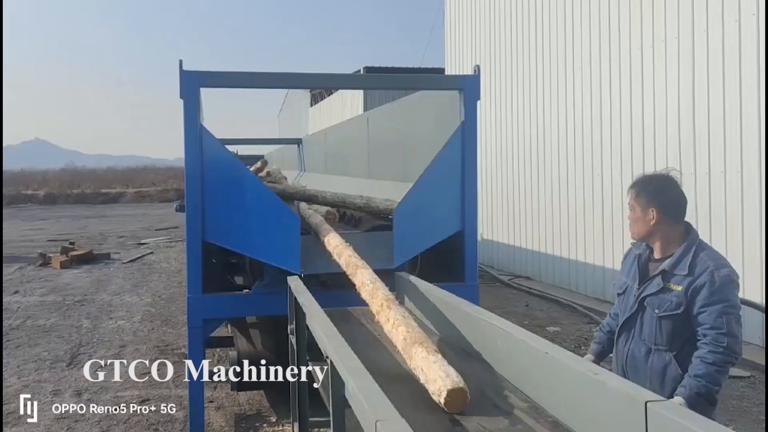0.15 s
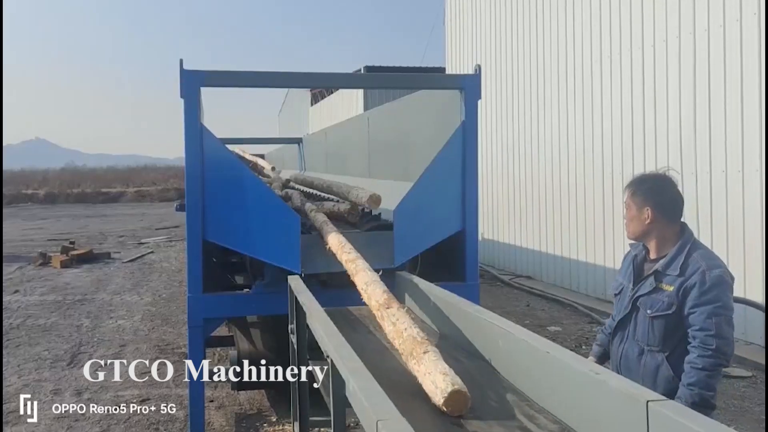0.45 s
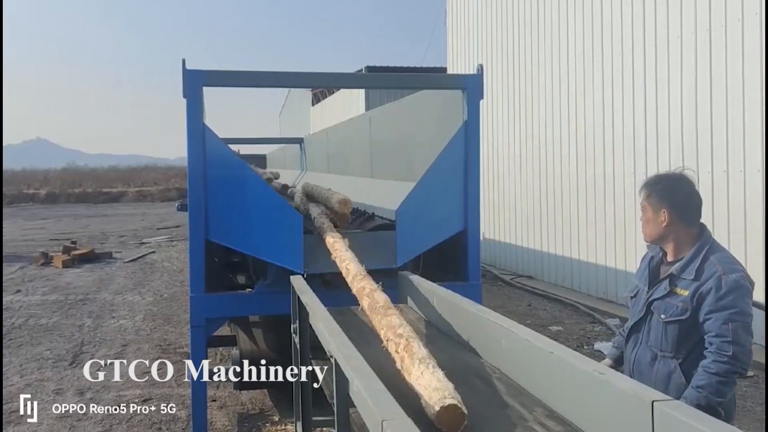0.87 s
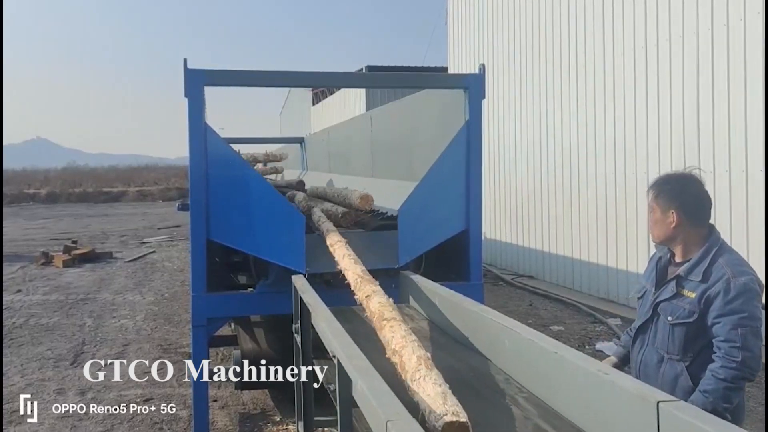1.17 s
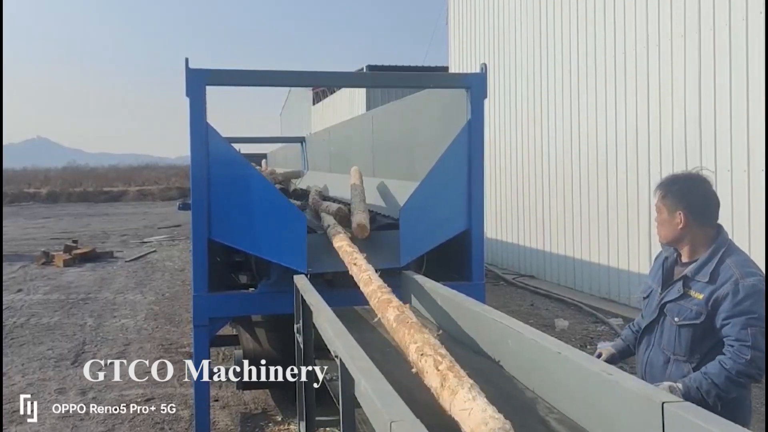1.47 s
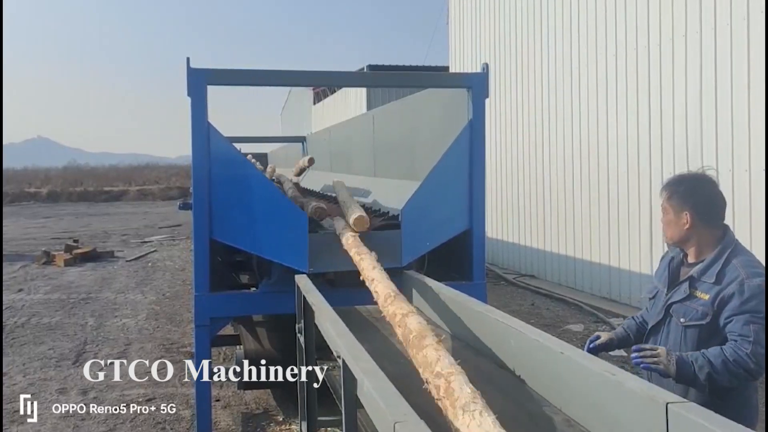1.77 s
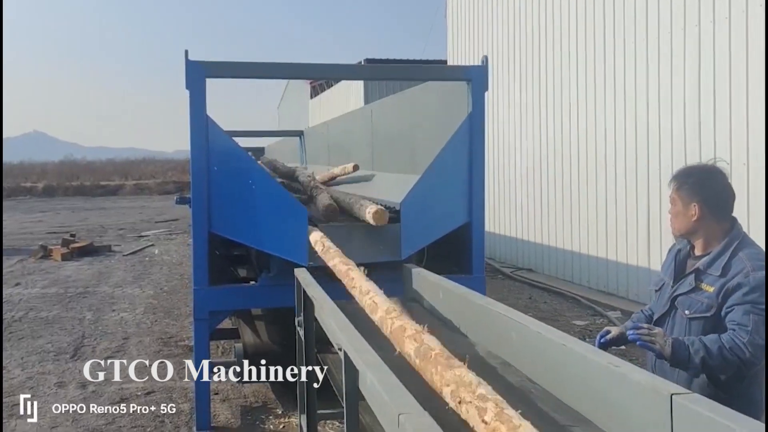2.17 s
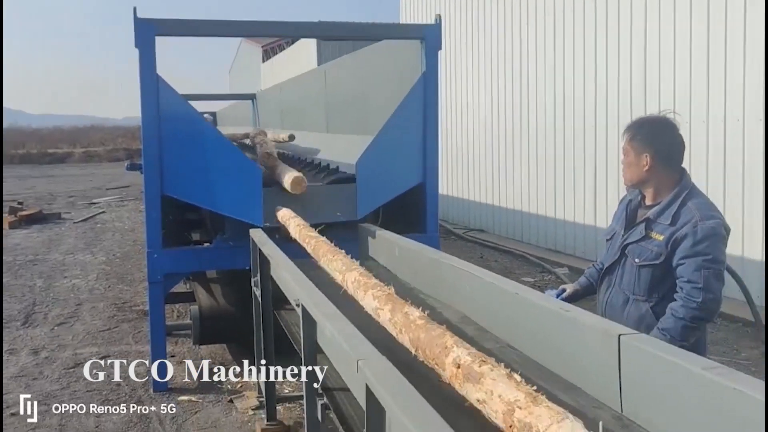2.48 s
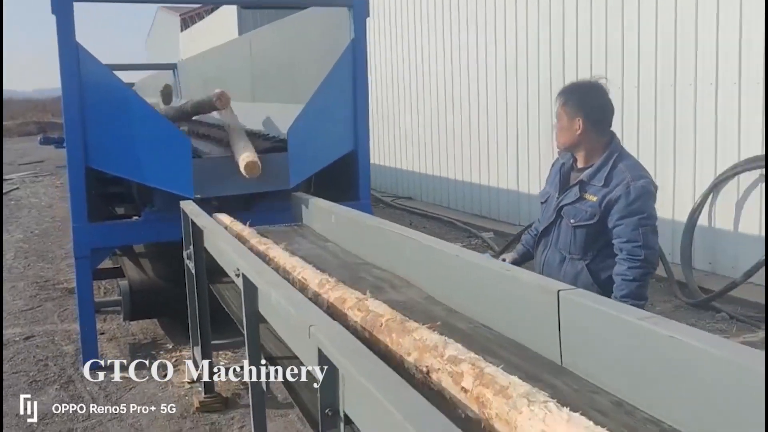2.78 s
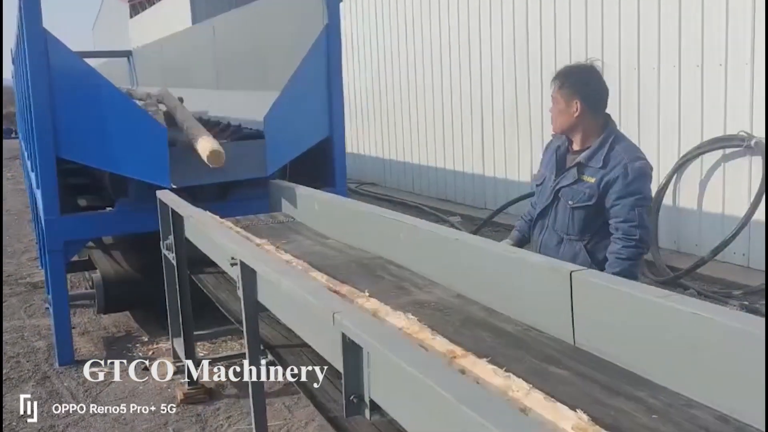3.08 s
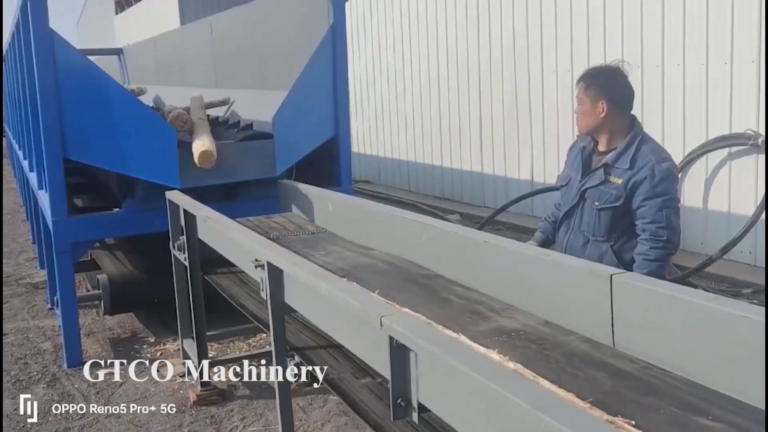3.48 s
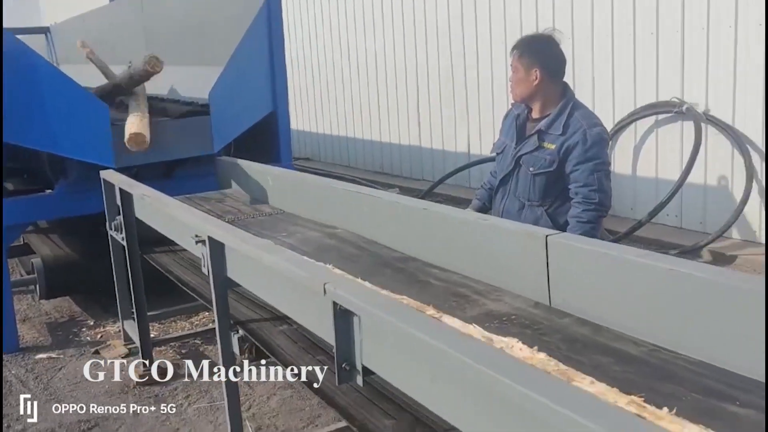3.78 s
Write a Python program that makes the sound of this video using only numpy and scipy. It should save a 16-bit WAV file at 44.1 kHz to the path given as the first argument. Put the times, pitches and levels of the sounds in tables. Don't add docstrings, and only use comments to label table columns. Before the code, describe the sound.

After a brief silence, a loud debarking machine cuts in and runs to the end, its low boom covered by rasping bark, skidding logs and irregular wooden thuds, heard outdoors on a slowly turning phone.

```python
import sys
import numpy as np
from scipy import signal
from scipy.fft import rfft, irfft, next_fast_len
from scipy.io import wavfile
from scipy.ndimage import uniform_filter1d, minimum_filter1d

SR = 44100
rng = np.random.default_rng(int(sys.argv[2]) if len(sys.argv) > 2 else 0)


def field_ratio(decibels):
    return 10 ** (np.asarray(decibels, dtype=float) / 20)


def to_wav(s):
    ch = np.atleast_2d(s).T
    pcm = np.round(np.clip(ch, -1, 1) * 32767)
    wavfile.write(sys.argv[1], SR, pcm.astype(np.int16))


N = 173754


def rms_one(x):
    return x / np.sqrt(np.mean(x ** 2) + 1e-20)


def seconds():
    return np.arange(N) / SR


def drift(rate_hz):
    r = np.exp(-2 * np.pi * rate_hz * 40 / SR)
    noise = rng.standard_normal(N // 40 + 2002)
    slow = signal.lfilter([1], [1, -2 * r, r * r], noise)[2000:]
    return np.interp(np.arange(N) / 40, np.arange(len(slow)), rms_one(slow))


def hail(per_s, spread_db):
    size = field_ratio(spread_db * np.minimum(rng.exponential(1, N), 4)) * rng.standard_normal(N)
    struck = rng.random(N) < per_s / SR
    return rms_one(size * struck)


def coloured(x, points, patchy_db):
    hz, db = np.transpose(points)
    size = next_fast_len(N)
    f = np.arange(size // 2 + 1) * SR / size + 1e-3
    colour_db = np.interp(np.log(f), np.log(hz), db, left=-120, right=-120)
    spec = rfft(x, size) * field_ratio(colour_db)
    out = 0
    for centre in np.arange(np.log2(hz[0]), np.log2(hz[-1]) + 1 / 3, 1 / 3):
        share = np.clip(1 - 3 * np.abs(np.log2(f) - centre), 0, 1)
        out = out + irfft(spec * share, size)[:N] * field_ratio(patchy_db * drift(7.7))
    return rms_one(out)


def resonate(x, hz, width_hz):
    r = np.exp(-np.pi * width_hz / SR)
    dull = signal.sosfilt(signal.butter(2, 2 * hz, fs=SR, output="sos"), x)
    return rms_one(signal.lfilter([1, 0, -1], [1, -2 * r * np.cos(2 * np.pi * hz / SR), r * r], dull))


def steep_cut(x, hz):
    return signal.sosfilt(signal.cheby2(14, 75, hz, fs=SR, output="sos"), x)


def turned():
    middle_s, pace_s = 2.92, 0.53
    return 1 / (1 + np.exp(-(seconds() - middle_s) / pace_s))


def trough():
    # frequency in Hz, level in dB per Hz
    boom_colour = [(53, -32), (90, -8.5), (166, -0.5), (217, -3), (444, -9.5), (634, -10.5), (979, -20.5),
                   (1130, -21), (1900, -37), (2470, -68), (4180, -120)]
    # pitch in Hz, width in Hz, level in dB, change once turned aside in dB
    steel_panels = [(153, 27, -35, 0), (183, 14, -30, 1), (208.6, 11.3, -31, 0), (227.2, 11.6, -29.5, -0.3),
                    (406, 34, -42.5, 2), (516.4, 37, -37.5, 0.5), (646, 25, -36, -0.5),
                    (1143, 22, -44.5, -14), (1690, 17, -53, -3), (3330, 300, -53.5, -6),
                    (2380, 300, -57, 4)]
    # time in seconds, level in dB
    wood_load = [(.3, -1.1), (.5, -1.2), (.7, -.3), (.95, 0), (1.2, 0.3), (1.5, -1.3), (1.78, .3),
                 (1.81, -0.5), (1.87, -1.5), (2.1, 0.4), (2.4, 0.5), (2.7, -.3), (2.95, -0.6), (3.2, 0.5),
                 (3.45, 0.8), (3.63, 0.5), (3.8, -1.2), (3.94, 0.1)]
    blows_per_s, spread_db = 5000, 1
    far_blows = hail(blows_per_s, spread_db)
    near_blows = hail(blows_per_s, spread_db)
    boom = field_ratio(-21) * coloured(far_blows, boom_colour, patchy_db=0.63)
    aside = turned()
    ringing = 0
    for k, (hz, width_hz, db, turn_db) in enumerate(steel_panels):
        sign = (-1) ** k
        ringing = ringing + sign * field_ratio(db + turn_db * aside) * resonate(near_blows, hz, width_hz)
    load_db = np.interp(seconds(), *np.transpose(wood_load))
    return field_ratio(load_db) * (boom + ringing)


def rasp():
    # frequency in Hz, level in dB per Hz
    front_colour = [(900, -36), (1490, -2), (1950, -5), (2610, -5.5), (3350, -2), (4250, -8.5), (5730, -9),
                    (6510, -17), (8050, -14.5), (9010, -36)]
    # frequency in Hz, level in dB per Hz
    aside_colour = [(900, -39), (1490, -0.5), (1910, -4), (2410, 0.5), (3310, -6), (4250, -7),
                    (5730, -11.5), (6510, -15), (8050, -18), (9010, -32)]
    chips_per_s = 24000
    aside = turned()
    front = field_ratio(-39) * coloured(hail(chips_per_s, 0.43), front_colour, patchy_db=1.16)
    side = field_ratio(-37.5) * coloured(hail(chips_per_s, 0.99), aside_colour, patchy_db=1.0)
    sway = field_ratio(0.5 * drift(22.0))
    return sway * (np.sqrt(1 - aside) * front + np.sqrt(aside) * side)


def sheen():
    # frequency in Hz, level in dB per Hz
    sheen_colour = [(8000, -2), (8700, -6.5), (9600, -10.5), (11200, -8.5), (12000, -17), (12400, -48)]
    return field_ratio(-62.5 + 0.89 * drift(3.7)) * coloured(rng.standard_normal(N), sheen_colour, patchy_db=3.0)


def wind():
    # time in seconds, level in dB
    gusts = [(0.2, -35), (0.32, -30.5), (.55, -36), (0.87, -26.5), (1.1, -35.5), (1.32, -26.5), (1.53, -25),
             (1.6, -34), (1.7, -27), (1.88, -36), (2.0, -24.5), (2.22, -35), (2.5, -27), (2.72, -32),
             (2.95, -28.5), (3.4, -31), (3.94, -27.5)]
    # frequency in Hz, level in dB per Hz
    wind_colour = [(10, -34), (25, -2.5), (40, -2.5), (64, 7.5), (100, -2.5), (130, -6), (200, -36)]
    gust_db = np.interp(seconds(), *np.transpose(gusts)) - 1.5
    return field_ratio(gust_db) * coloured(rng.standard_normal(N), wind_colour, patchy_db=2.5)


def skids():
    # peak in seconds, level in dB, rise in seconds, fall in seconds, tooth ring in Hz
    skid_events = [(.21, -38, .04, 0.034, 3200), (0.25, -43, .001, 0.0033, 3300),
                   (.531, -32.5, 0.038, 0.026, 3070), (.575, -34, 0.018, .02, 3620),
                   (.626, -38, 0.024, 0.026, 3200), (.96, -43, 0.028, .02, 3200),
                   (.991, -36, 0.037, 0.06, 3730), (1.075, -45, .02, .015, 3600),
                   (1.101, -40.5, 0.018, 0.03, 3000), (1.531, -39.5, 0.022, 0.11, 3300),
                   (1.971, -44, .035, 0.032, 3300), (3.5, -42, 0.049, 0.035, 3240)]
    # frequency in Hz, level in dB per Hz
    skid_colour = [(1060, -42), (1800, -6), (2650, -10), (3300, -2.5), (4200, -7.5), (5470, -8),
                   (8070, -19), (8600, -22), (11000, -26.5), (12100, -46)]
    t = seconds()
    grit = hail(9000, 1.7)
    broad = coloured(grit, skid_colour, patchy_db=0.4)
    out = 0
    for s, db, rise_s, fall_s, hz in skid_events:
        slope_s = np.where(t < s, rise_s, fall_s)
        swell = field_ratio(db) * np.exp(-((t - s) / slope_s) ** 2)
        out = out + swell * (broad + field_ratio(-9.5) * resonate(grit, hz, width_hz=170))
    return out


def ticks():
    # start in seconds, level in dB
    snaps = [
        (0.22, -25.5),
        (2.637, -24.5),
        (1.803, -29),
    ]
    t, fall_s = seconds(), 0.0013
    crack = signal.lfilter([1], [1, -0.7], rng.standard_normal(N))
    shape = 0
    for s, db in snaps:
        shape = shape + field_ratio(db) * (t >= s) * np.exp(-np.maximum(t - s, 0) / fall_s)
    return crack * shape


def wooden_blows(rows, t60_s, gain_db, swell_s):
    out, t = np.zeros(N + SR), np.arange(SR // 4) / SR
    for s, db, hz in rows:
        tone = np.sin(2 * np.pi * hz * t) + field_ratio(-8.5) * np.sin(2 * np.pi * 1.37 * hz * t)
        decay = field_ratio(db + gain_db - 60 * t / t60_s)
        start = int(s * SR)
        out[start:start + len(t)] += decay * (1 - np.exp(-t / swell_s)) * tone
    return out[:N]


def knocks():
    # start in seconds, level in dB, pitch in Hz
    knock_events = [(.34, -1, 187), (.368, -9, 506), (.469, -5, 343), (.625, -14, 782), (0.653, -6, 209),
                    (1.265, -2, 188), (1.764, -4, 168), (1.784, -2.5, 175), (1.803, -5.5, 564),
                    (1.825, -3.5, 554), (1.988, -10.5, 230), (2.457, -7.5, 398), (2.636, -8, 576),
                    (.43, -10, 527), (.607, -11.5, 347), (1.163, -10.5, 507), (1.698, -17, 483),
                    (2.235, -14.5, 331), (2.278, -20, 544), (3.372, -8.5, 305), (3.697, -10, 306),
                    (2.976, -7, 155), (3.496, -7, 329)]
    return wooden_blows(knock_events, t60_s=0.085, gain_db=-7, swell_s=0.0012)


def rubs():
    # peak in seconds, level in dB, half length in seconds, pitch in Hz
    rub_events = [(0.538, -36, 0.061, 1110), (.53, -48, .04, 2070), (0.534, -36, .02, 3080),
                  (1.004, -46, .035, 4700), (1.833, -30, 0.016, 550), (2.17, -35, 0.042, 133),
                  (2.583, -35, .05, 138), (0.644, -28.5, 0.036, 776), (1.565, -27, .06, 672),
                  (2.304, -37, 0.059, 1220), (2.66, -39, 0.054, 1120), (2.742, -42, .04, 1540),
                  (2.834, -37, 0.044, 1140), (3.117, -39.5, .04, 1740), (3.137, -44, 0.036, 3200),
                  (3.23, -42, 0.027, 3080), (3.3, -46, 0.13, 2380), (.45, -30, 0.054, 530),
                  (2.522, -31, .06, 410), (2.9, -25, 0.088, 140.5), (1.206, -30, 0.059, 330),
                  (3.509, -31.5, 0.043, 813), (3.518, -37, 0.046, 1350), (3.604, -39, 0.037, 1090),
                  (3.6, -41, .05, 2330), (3.62, -40, 0.045, 1480), (3.746, -37.5, .03, 1360),
                  (3.92, -43, 0.025, 1300)]
    t = seconds()
    grit = hail(8000, 1.6)
    out = 0
    for s, db, half_s, hz in rub_events:
        swell = field_ratio(db) * np.exp(-((t - s) / half_s) ** 2)
        out = out + swell * resonate(grit, hz, hz / 10.5)
    return out


def thumps():
    # start in seconds, level in dB, pitch in Hz
    thump_events = [(0.515, -16, 220), (0.737, -8, 172), (1.001, -8, 244), (1.104, -7, 160),
                    (1.18, -25, 223), (1.341, -12.5, 197), (1.434, -9.5, 221), (1.602, -8, 171),
                    (1.716, -13.5, 275), (1.926, -11, 186.5), (2.238, -11, 224), (2.432, -7, 237),
                    (2.541, -12, 165), (2.598, -11.5, 173), (2.826, -17, 171), (2.908, -11.5, 140),
                    (3.013, -10, 172), (3.052, -13, 180), (3.516, -15, 183), (3.651, -21, 161),
                    (3.775, -4.5, 235), (3.836, -20, 167)]
    return wooden_blows(thump_events, t60_s=0.1, gain_db=-2, swell_s=0.003)


def scene():
    body = trough() + rasp() + wind() + knocks() + thumps()
    return (steep_cut(body, 9150) + sheen() + skids() + ticks() + rubs())[None]


def limiter(x):
    ceiling, window = 0.375, 441
    peak = -minimum_filter1d(-np.abs(x), size=window)
    return x * uniform_filter1d(np.minimum(1, ceiling / (peak + 1e-9)), size=window)


def treble_dropouts(x):
    # frequency in Hz, share 0-1
    lost_share = [(5000, 0), (6000, 0.07), (7000, 0.07), (8000, 0.18), (8300, 0.76), (8750, 0.91),
                  (9050, 0.65), (9300, 0.3), (10500, 0.4), (11600, 0.34), (12100, .95)]
    band_hz, lost_db = 250, -41
    f, _, spec = signal.stft(x, SR, nperseg=1024)
    band = (f // band_hz).astype(int)
    luck = uniform_filter1d(rng.standard_normal((100, spec.shape[-1])), size=5) * np.sqrt(5)
    rank = 1 / (1 + np.exp(-1.7 * luck))
    share = np.interp(f, *np.transpose(lost_share))[:, None]
    kept = np.where(rank[band] < share, field_ratio(lost_db), 1)
    return signal.istft(spec * kept, SR, nperseg=1024)[1][:, :N]


def sample_jumps():
    # start in seconds, step height in full scale
    jump_events = [
        (1.44687, -.075),
        (2.81222, .07),
    ]
    t, fade_s = seconds(), 0.001
    out = 0
    for s, height in jump_events:
        out = out + height * (t >= s) * np.exp(-np.maximum(t - s, 0) / fade_s)
    return out


def top_cut(x):
    return signal.sosfilt(signal.butter(12, 16000, fs=SR, output="sos"), x)


def record(dry):
    # time in seconds, gain in dB
    opening = [
        (.1685, -80),
        (.1697, -19),
        (.19, -11.5),
        (.235, -13.5),
        (.2495, -7.5),
        (.2505, -1.5),
        (.29, 0),
    ]
    t = seconds()
    open_s, open_db = np.transpose(opening)
    opened = limiter(dry) * field_ratio(np.interp(t, open_s, open_db))
    heard = treble_dropouts(steep_cut(opened, 13400)) * (t > open_s[0])
    return top_cut(heard + sample_jumps())


dry = scene()
out = record(dry)
to_wav(out)
```